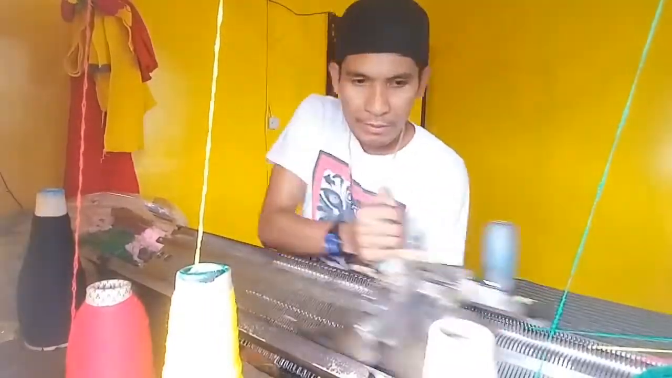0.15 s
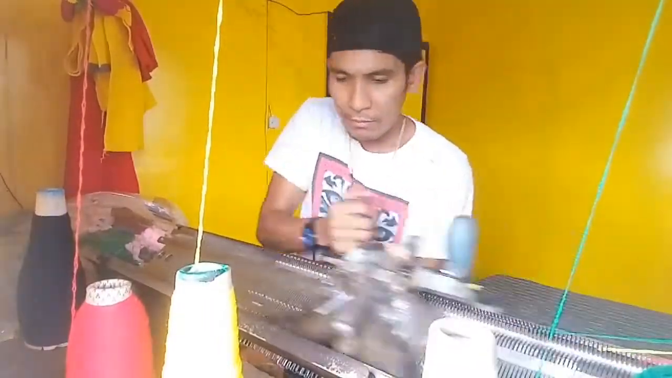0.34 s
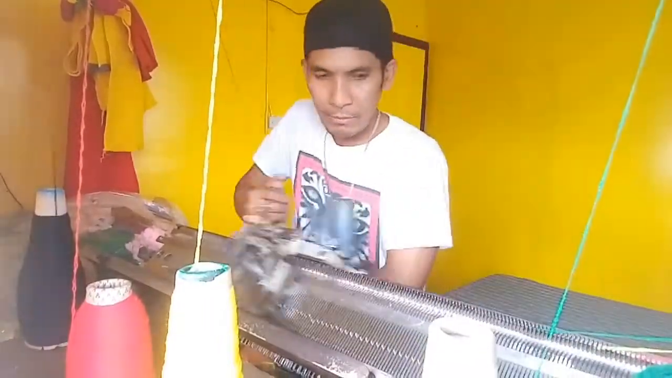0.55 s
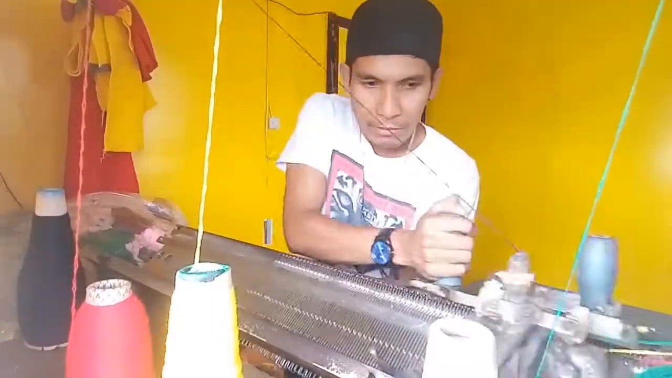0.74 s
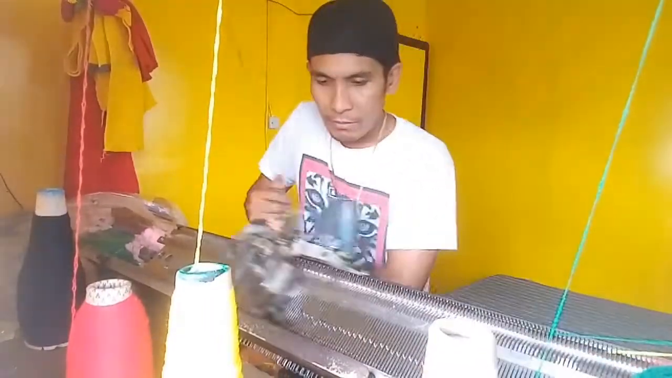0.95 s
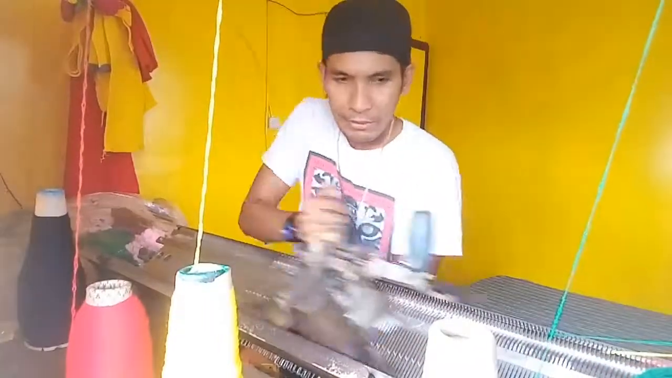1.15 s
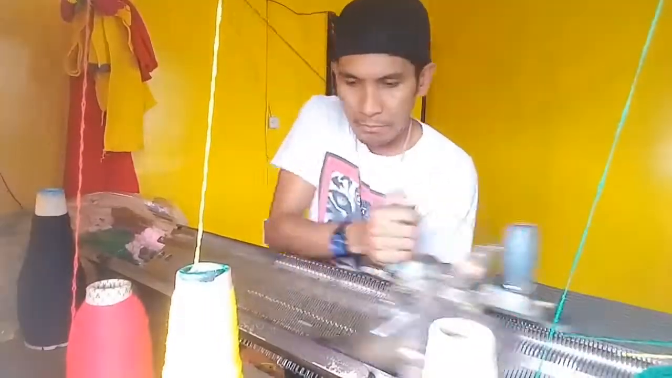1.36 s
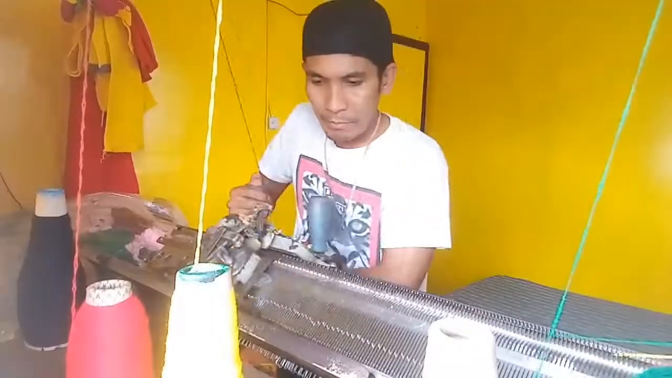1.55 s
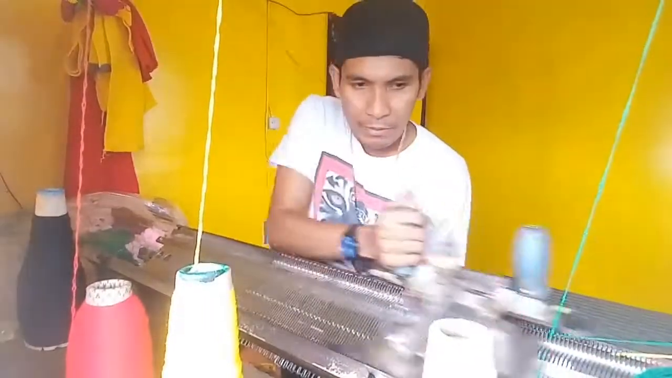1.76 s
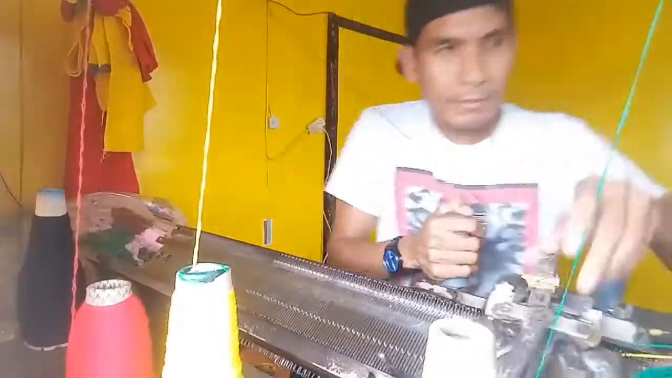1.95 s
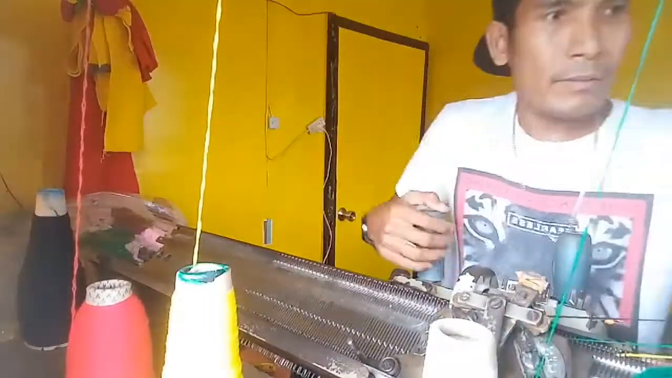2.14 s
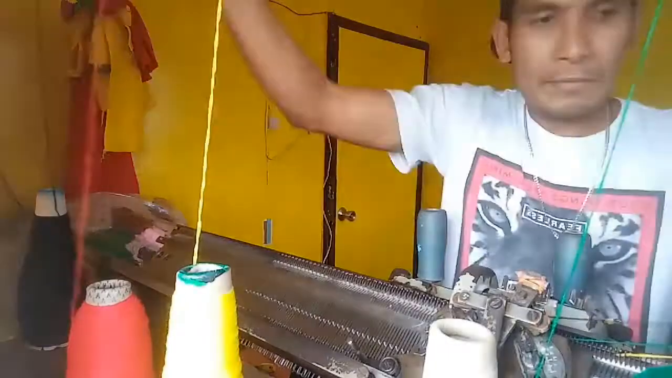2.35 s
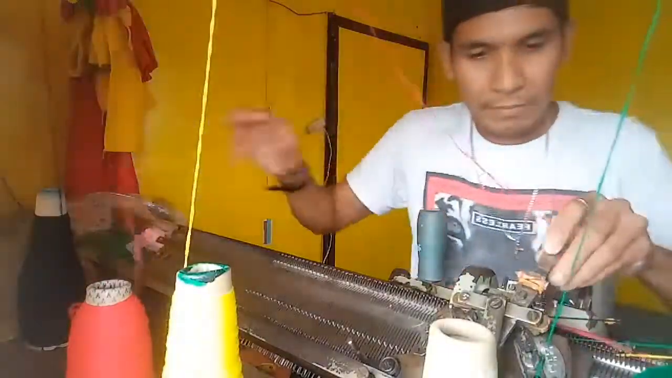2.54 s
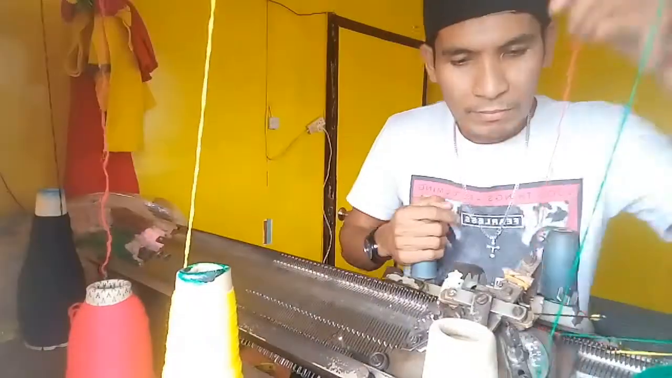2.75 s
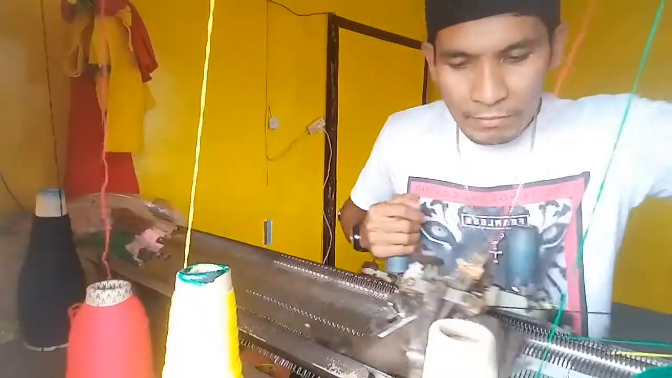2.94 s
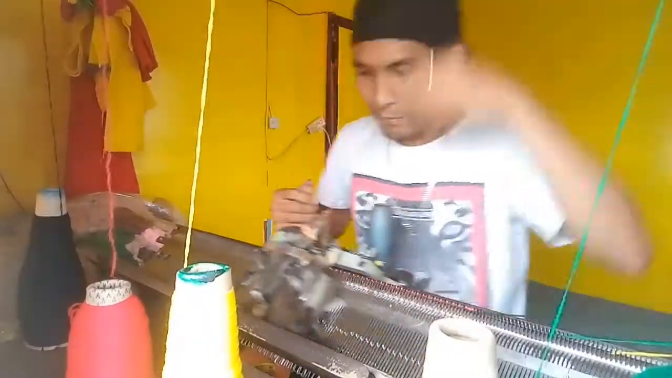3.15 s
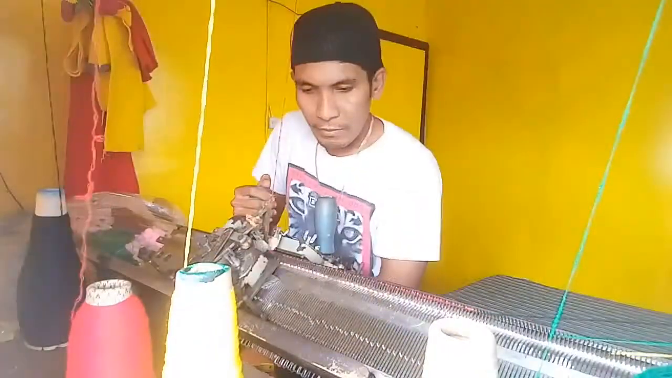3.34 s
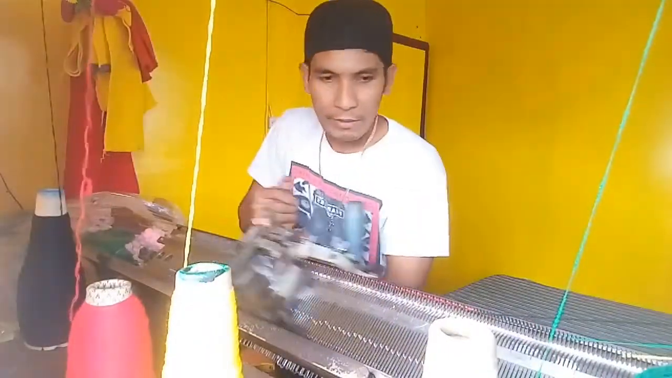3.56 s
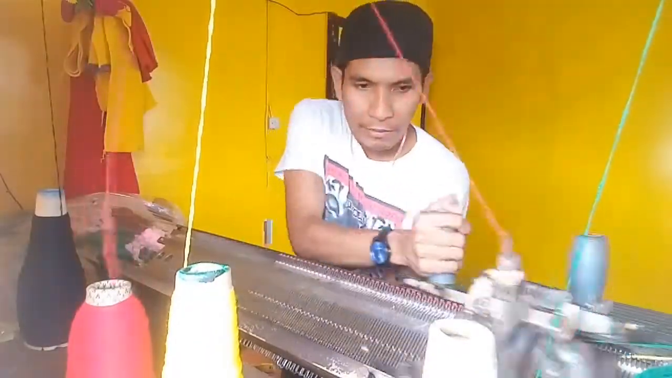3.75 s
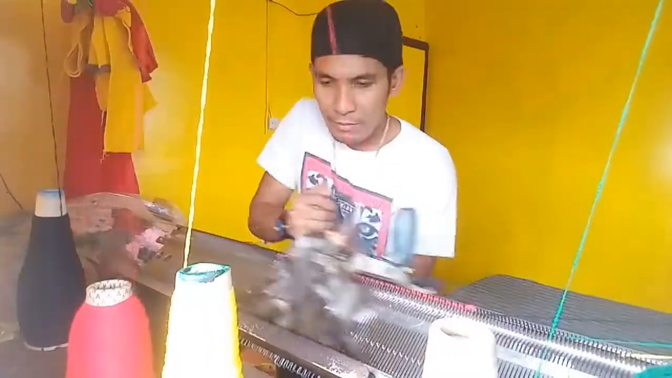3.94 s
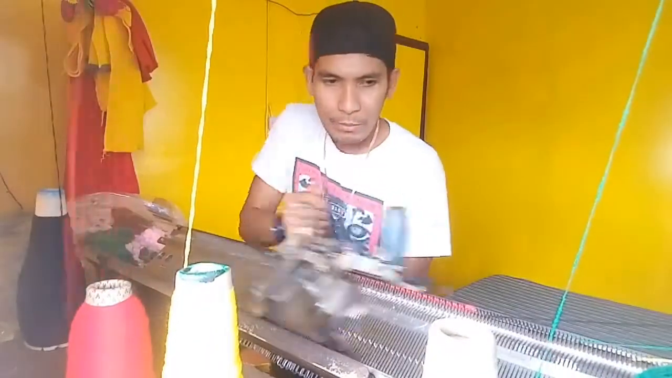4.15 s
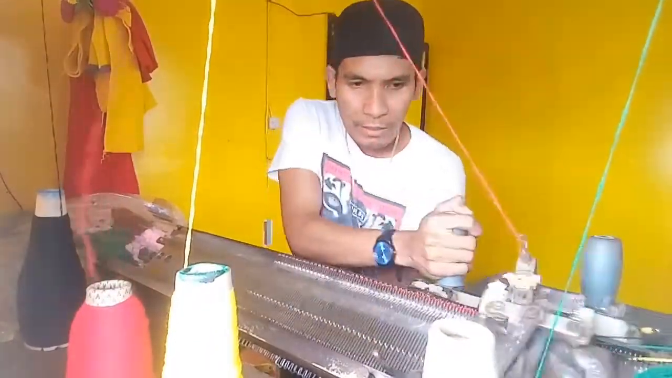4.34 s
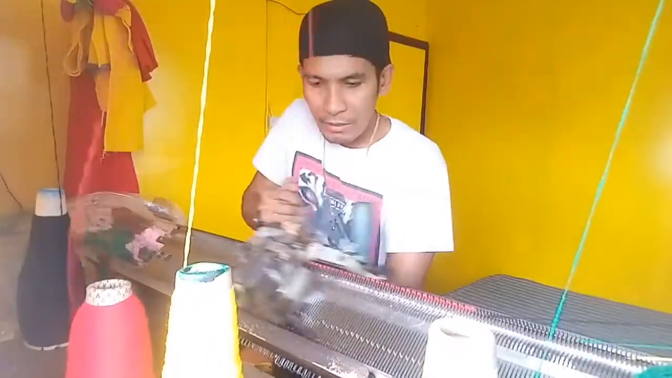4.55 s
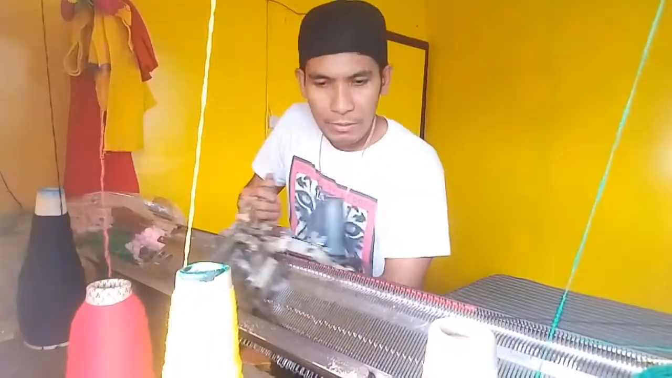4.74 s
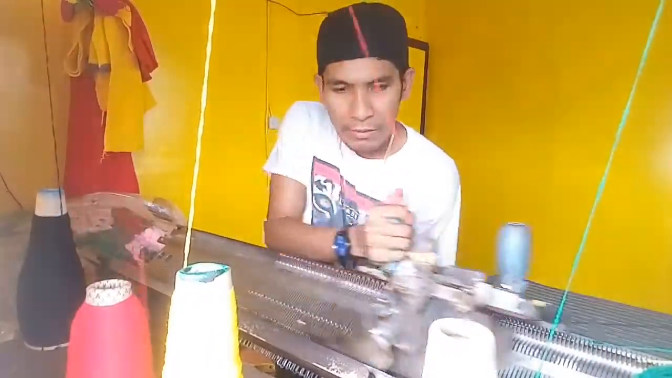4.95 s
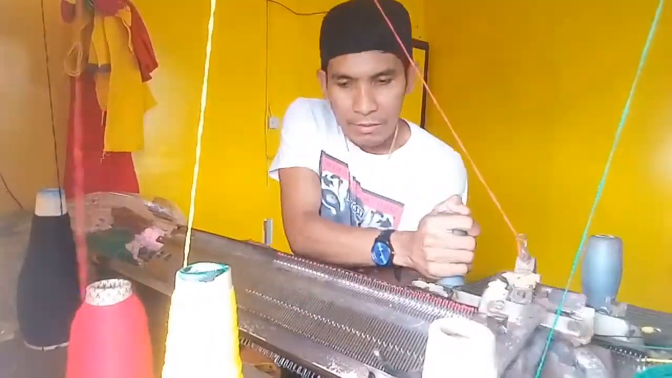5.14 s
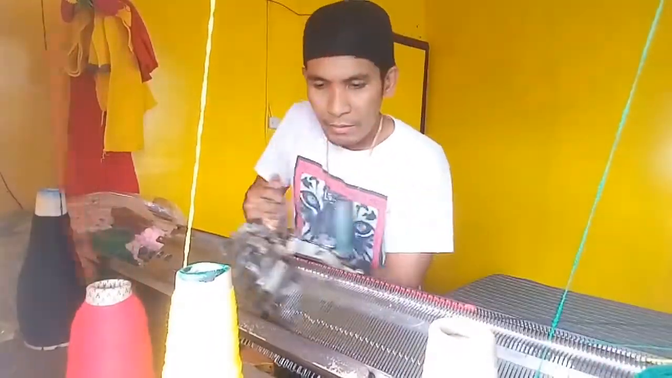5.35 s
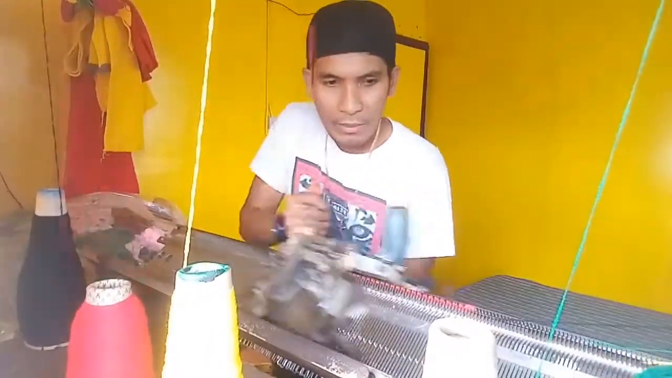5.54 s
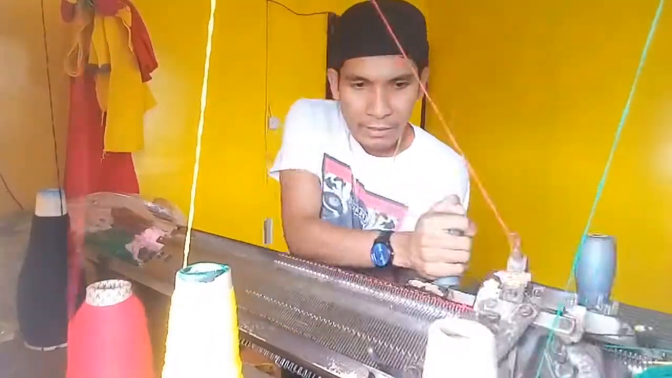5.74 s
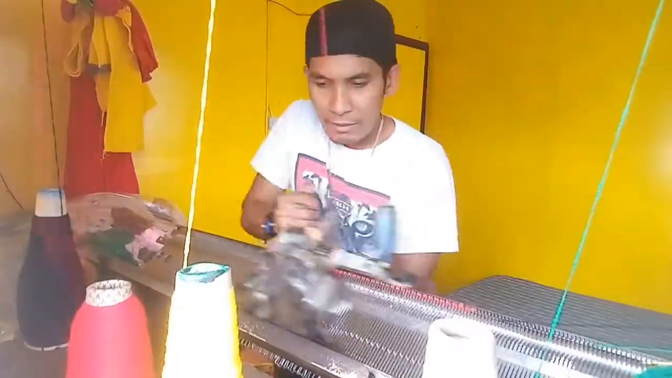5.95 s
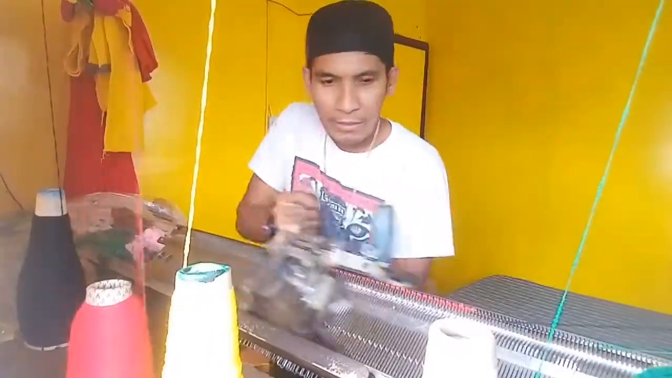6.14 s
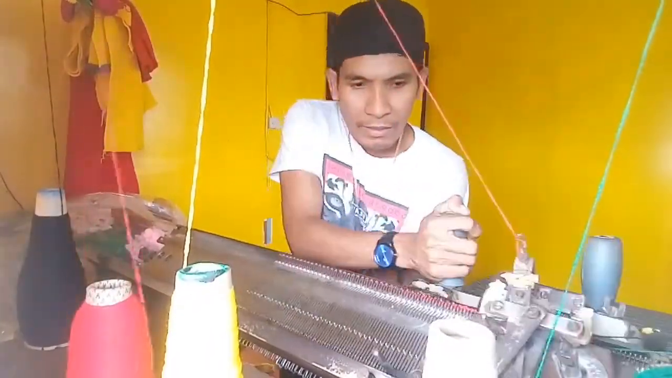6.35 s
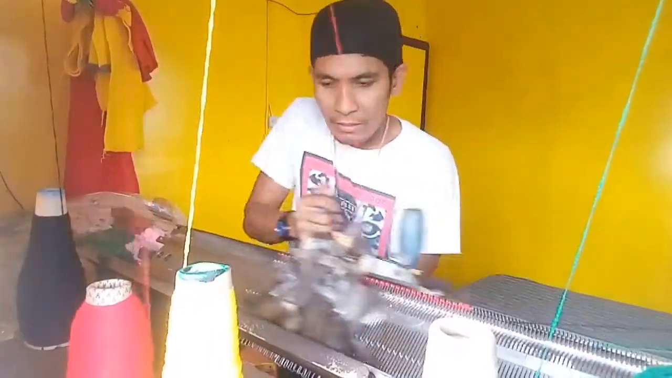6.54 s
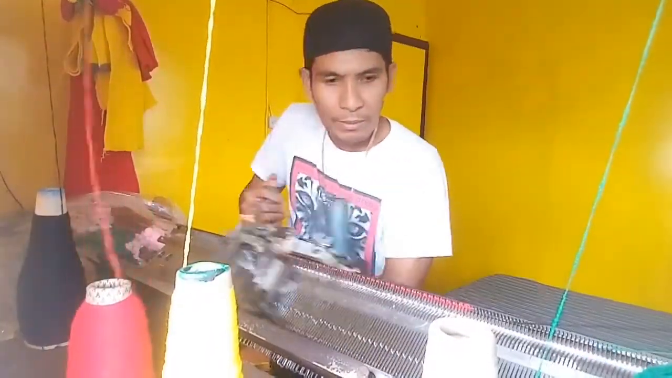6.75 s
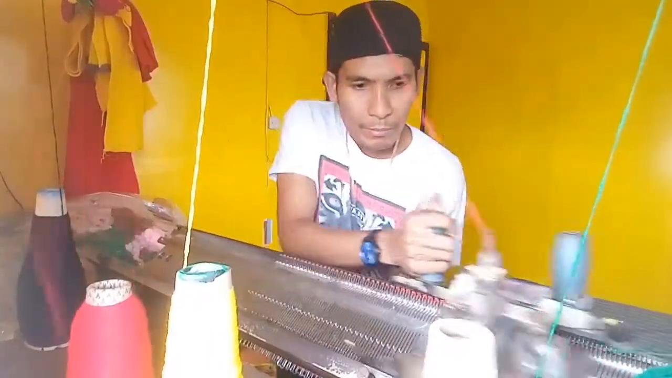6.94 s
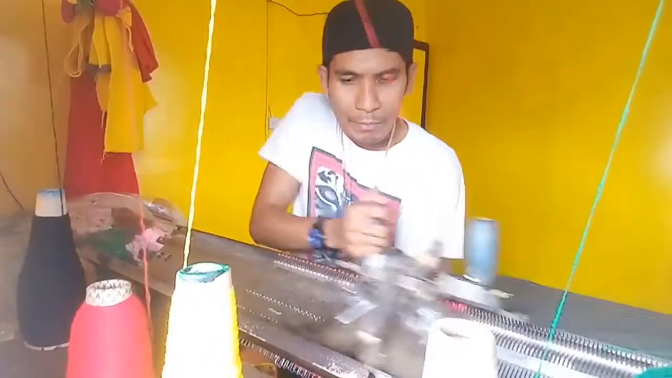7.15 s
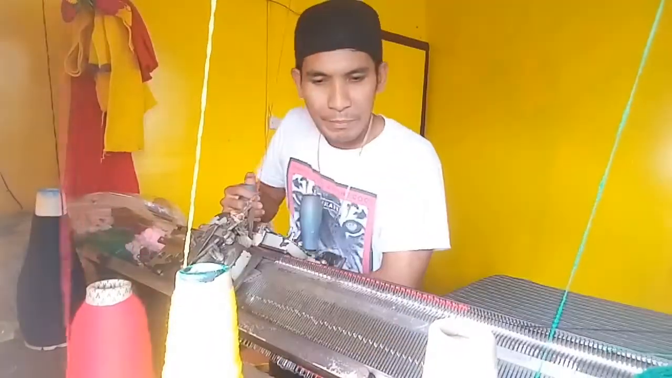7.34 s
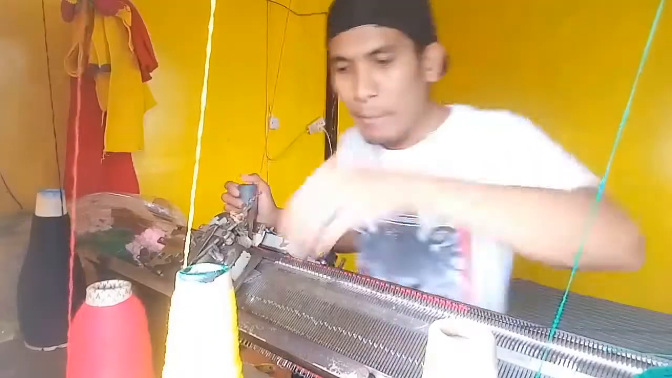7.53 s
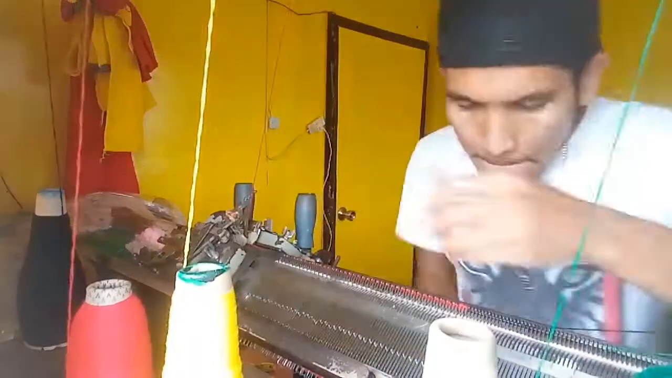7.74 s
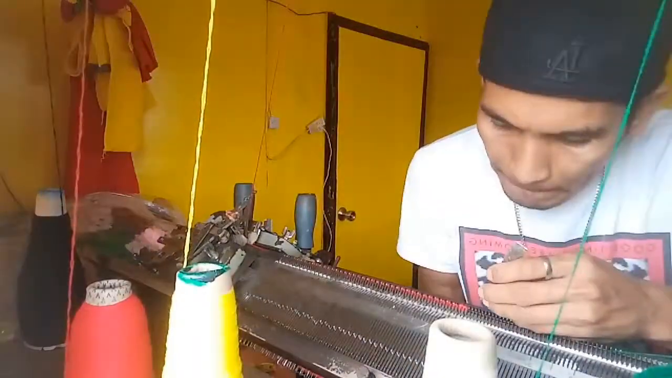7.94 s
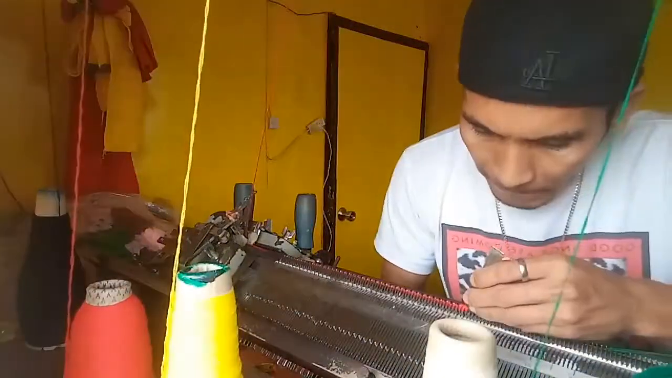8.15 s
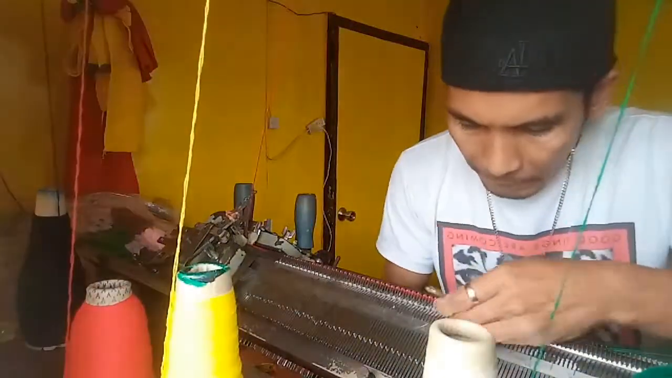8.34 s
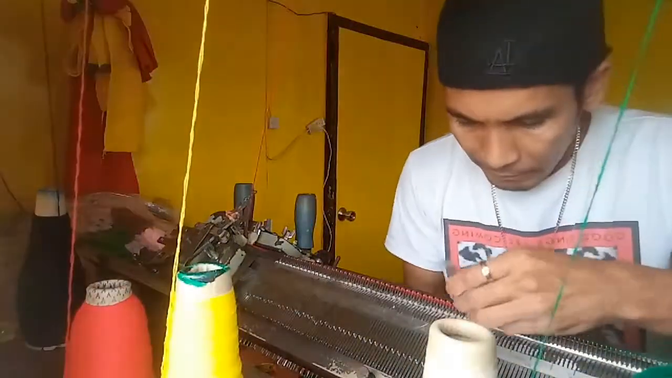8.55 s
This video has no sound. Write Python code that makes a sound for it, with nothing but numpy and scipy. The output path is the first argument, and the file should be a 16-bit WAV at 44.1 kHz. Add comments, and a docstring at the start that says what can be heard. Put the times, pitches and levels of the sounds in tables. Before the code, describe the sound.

Close on the shaking frame of a hand knitting machine in a small room, a steel carriage rakes through needles in bright, zipping strokes, rumbling on its rail and clacking at each turn. After two seconds it rests amid groans, clicks and a squeak, makes one slow pass, then a lever drops. Quick strokes resume until nearly eight seconds, ending in faint bumps and quiet.

```python
"""A bright rattle opens the scene: the cams of a hand knitting machine rake through its needles, in a small room.
The steel carriage is pushed to and fro, about three strokes a second; it rumbles on its rail and clacks at the turns.
Rattle is trains of needle ticks, rumble is noise and ticks through resonances, clacks are dying noise and ringing modes.
It rests three times, with a slow pass after the first, as loose parts are set by hand: the frame groans, sways and
booms, a guide squeaks, parts bump, a lever drops. The microphone stands close, on the shaking frame."""
import sys
import numpy as np
from scipy import signal
from scipy.fft import rfft, irfft, next_fast_len
from scipy.io import wavfile
from scipy.ndimage import uniform_filter1d, map_coordinates

SR = 44100
rng = np.random.default_rng(int(sys.argv[2]) if len(sys.argv) > 2 else 0)


def transcribe(u):
    """Save the signal u as a 16-bit wav file named by the first command-line argument.

    u: samples, shape (n,) or (channels, n), limited to [-1, 1]; the rate is SR.
    q: integer samples, one column per channel.
    """
    v = np.clip(np.atleast_2d(u).T, -1, 1)
    q = np.round(v * 32767).astype(np.int16)
    wavfile.write(sys.argv[1], SR, q)


N = 383229  # length in samples
STILL_DB = -90  # level of a rolling part at a standstill, before trim

# pushes of the carriage, levels before trim: enter_s (cams meet the needles), run_up_s (before enter_s),
# pass_s, coast_s (after the pass), level_db, gathered_db (gained on the way), braked_db (lost in braking),
# weight_db (extra load on the rail)
PUSHES = [ (-.02, 0.056, 0.17, 0.07, -22.5, -3, 2.5, 0.5),
          (0.244, 0.0067, 0.17, 0.029, -21.5, -2, 1.5, -0.5),
          (0.504, 0.026, 0.15, 0.044, -22, -4, 5.5, 0.5), (0.767, 0.031, 0.18, 0.087, -21.5, 1, 14, 1),
          (1.042, .02, 0.14, 0.06, -20.5, -1.5, 6.5, 0), (1.282, 0.014, 0.19, 0.095, -21, 1.5, 14.5, 0),
          (1.535, 0.012, .167, 0.043, -20, 3.5, 7.5, -1.5), (1.831, 0.036, 0.18, 0.018, -21, 0.5, 9.5, 0.5),
          (2.06, 0.0093, 0.21, .016, -21.5, 3, 10.5, 1.5), (3.206, .005, 0.077, .003, -44.5, 0, 2, -5),
          (3.334, .005, 0.081, .01, -43, 3.5, 4, -0.5), (3.424, 0.0017, 0.32, 0.0038, -25, 10.5, 13.5, 0.5),
          (4.042, .015, 0.18, 0.058, -23, -2, 5.5, 1.5), (4.35, 0.015, 0.17, 0.025, -23, -3, 1, 0.5),
          (4.614, 0.025, 0.17, 0.039, -20.5, 0.5, 12, 0),
          (4.879, 0.0058, 0.22, 0.078, -21.5, 5.5, 2.5, -0.5), (5.261, 0.024, .238, .11, -26, -4.5, 4, 3),
          (5.705, 0.029, 0.19, 0.076, -21.5, 0, 8, -1), (6.0, 0.017, 0.2, 0.029, -21, 0, 11.5, 0.5),
          (6.34, 0.0017, .178, 0.076, -22, 0, 1.5, -0.5), (6.614, 0.014, 0.21, .031, -21, 0.5, 9.5, 1.5),
          (6.997, 0.0223, 0.18, 0.043, -23, -4, 9, 0.5), (7.267, 0.0021, 0.21, 0.039, -21.5, -1, 9.5, 1.5),
          (7.656, .003, 0.22, .003, -22, -3.5, 21.5, 1.5)]
# colour of needle contacts: freq_hz, level_db
NEEDLE_COLOUR = [(350, -25.5), (700, -7), (880, -5), (1060, -12), (1270, -3.5), (1750, -5), (2150, -7),
                 (3000, -5.5), (4000, -7), (5450, 1), (7170, 0.5), (8640, -8.5), (10800, -10),
                 (12400, -35.5)]
# colour of the carriage on its rail, and of dull bumps on the bed: freq_hz, level_db
RAIL_COLOUR = [(180, -40.5), (290, -3.5), (400, -1.5), (500, -1.5), (640, 0), (720, -6), (790, -6.5),
               (900, -5), (1060, -18), (1300, -9), (2200, -31.5), (5000, -59)]


def amp(db):
    """Decibels to gain."""
    return 10 ** (np.asarray(db) / 20)


def unit(x):
    """Scale to rms 1."""
    return x / np.sqrt(np.mean(x ** 2) + 1e-20)


def along(points, hz):
    """Read (Hz, value) points on a log frequency axis."""
    f, v = np.transpose(points)
    return np.interp(np.log(hz + 1), np.log(f + 1), v)


def coloured(x, spectrum):
    """Give x the (Hz, dB) colour with a minimum-phase filter, so that attacks stay sharp."""
    m = 2 * next_fast_len(len(x) // 2 + 2048)
    shape_db = along(spectrum, np.fft.rfftfreq(m, 1 / SR))
    # folding the cepstrum makes the filter causal
    cepstrum = irfft(np.log(amp(shape_db) + 1e-6), m)
    cepstrum[1:m // 2] *= 2
    cepstrum[m // 2 + 1:] = 0
    return irfft(rfft(x, m) * np.exp(rfft(cepstrum)), m)[:len(x)]


def add(track, s, sound):
    """Mix a sound in at time s."""
    i = max(round(s * SR), 0)
    track[i:i + len(sound)] += sound[:max(len(track) - i, 0)]


def burst(t60, size=8192):
    """The dense, dying ring of a small steel part: decaying noise, t60 in s."""
    return rng.standard_normal(size) * amp(-60 * np.arange(size) / SR / t60)


def wobble(rate, size):
    """A smooth random curve, rate knots a second."""
    knots = rng.standard_normal(int(size * rate / SR) + 4)
    return map_coordinates(knots, [np.arange(size) * rate / SR])


def shifting(x, depth_db, size=4, count=16):
    """The resonances change as the carriage moves: gains drift, smoothed over size bins and count frames."""
    z = signal.stft(x, nperseg=512)[2]
    field = uniform_filter1d(rng.standard_normal(z.shape), size, 0)
    field = uniform_filter1d(field, count, 1)
    moved = signal.istft(z * amp(depth_db * unit(field)), nperseg=512)[1]
    return unit(moved[:len(x)])


def ticks(rate, scatter, uneven_db):
    """One tick per needle at the given rate, each a little early or late (scatter in needles), strong or weak."""
    count = np.cumsum(rate) / SR
    needle = np.arange(int(count[-1]))
    chance = rng.standard_normal((len(needle), 2))
    at = np.searchsorted(count, needle + scatter * chance[:, 0])
    strength = amp(uneven_db * np.clip(chance[:, 1], -2, 2))
    return np.bincount(at, strength, len(rate) + 1)[:len(rate)]


def contacts(rate, t60, kept_db=-4, count=4):
    """Each needle is raised, flips its latch, is pulled down and is released: four trains of ticks."""
    out = np.zeros(len(rate))
    decay = amp(-60 * np.arange(SR // 10) / SR / t60)
    for _ in range(count):
        train = ticks(rate, scatter=.22, uneven_db=0.5)
        # within a train the cam rings alike each time, but every needle has a ring of its own
        cam = signal.fftconvolve(train, burst(t60))[:len(rate)]
        energy = np.abs(signal.fftconvolve(train ** 2, decay ** 2)[:len(rate)])
        needle_rings = np.sqrt(energy) * rng.standard_normal(len(rate))
        out += amp(kept_db) * cam + needle_rings
    return unit(out)


def needles(peak_rate=420, edge=.003, slow_tilt_db=5.0, judder_db=1.5):
    """The cams run through the needles, fastest in mid-stroke, and leave the last one abruptly."""
    gather_share = 0.52  # part of the pass over which the push reaches its level
    brake_db_per_s = 217.5  # the rattle fades this fast as the arm brakes
    out = np.zeros(N)
    for enter, _, length, _, db, gathered_db, braked_db, _ in PUSHES:
        leave = enter + length
        t = np.arange(max(enter, -edge), leave + edge, 1 / SR)
        way = np.linspace(0, 1, len(t))
        speed = .6 + .4 * np.sin(np.pi * way)
        missing_db = gathered_db * np.clip(1 - way / gather_share, 0, 1)
        braking_db = np.maximum(braked_db - brake_db_per_s * (leave - t), 0)
        level = db - missing_db - braking_db
        clicks = contacts(peak_rate * speed, t60=.012)
        rattle = shifting(coloured(clicks, NEEDLE_COLOUR), depth_db=1.5)
        # gentle contacts are duller than hard ones
        dull = signal.sosfilt(signal.butter(1, 3000, fs=SR, output="sos"), rattle)
        softness = np.clip((np.max(level) - level) / 10, 0, 1)
        rattle = unit(rattle + (amp(slow_tilt_db * softness) - 1) * dull)
        # the carriage judders over stiff and easy stitches
        judder = judder_db * wobble(140, len(t))
        engaged = np.clip(np.minimum(t - t[0], t[-1] - t) / edge, 0, 1)
        add(out, t[0], rattle * engaged * amp(level + judder))
    return out


def pushed(law):
    """Level in dB of a part that builds up with each push, holds through the needles, coasts and dies at the halt."""
    wake_s, dying_s = .02, .07  # fades from and to stillness
    brake_share = 0.11  # part of the braking loss that the rolling parts feel
    over_db, short_db, build, coast_db = law
    t, out = np.arange(N) / SR, np.full(N, float(STILL_DB))
    for enter, run_up, length, coast, db, gathered_db, braked_db, weight_db in PUSHES:
        start, leave = enter - run_up, enter + length
        halt = leave + coast
        built = min(start + build, leave)
        top = db + weight_db + over_db
        braked = top - brake_share * braked_db
        times = [start - wake_s, start, built, (built + leave) / 2, leave, halt, halt + dying_s]
        times = np.maximum.accumulate(times)
        levels = [STILL_DB, top - gathered_db - short_db, top - gathered_db / 2, top,
                  braked, braked - coast_db, STILL_DB]
        now = slice(*np.searchsorted(t, times[[0, -1]]))
        # where pushes overlap, the stronger one is heard
        out[now] = np.maximum(out[now], np.interp(t[now], times, levels))
    return out


def curves(rows):
    """One value per sample for each column after the time."""
    s, *cols = np.transpose(rows)
    return [np.interp(np.arange(N) / SR, s, c) for c in cols]


def resting():
    """Levels in dB of rumble, rail and hiss while hands rest on the machine, ease it along or lean on it."""
    # three spells, levels before trim: time_s, rumble_db, rail_db, hiss_db
    creep = [(2.29, -48, -50, -56), (2.39, -38, -53, -56.5), (2.48, -47, -52, -49), (2.564, -36, -44, -48),
             (2.648, -56, -42.5, -44), (2.71, -43, -45.5, -63), (2.832, -42, -46, -50),
             (3.006, -47, -49.5, -64), (3.026, -44, -50, -53), (3.132, -57, -51.5, -43),
             (3.19, -51.5, -53.5, -50), (3.45, -43.5, -54, -72)]  # hands rest on the machine or ease it along
    pause = [(3.745, -43, -53.5, -49), (3.795, -50.5, -58.5, -71), (3.947, -55, -60.5, -62),
             (3.965, -73, -66.5, -70), (3.991, -45.5, -54, -59), (4.04, -52, -53, -49)]  # the same, more briefly
    lean = [(7.89, -61.5, -72, -65), (8.028, -59, -66, -55), (8.156, -58, -68, -74),
            (8.394, -62, -69, -66.5), (8.69, -63, -61, -73)]  # the machine is leant on in the last rest
    # trim of the spells: rumble_db, rail_db, hiss_db
    rest_trim = (2.5, 2.5, -2)
    t = np.arange(N) / SR
    spells = []
    for rows in (creep, pause, lean):
        inside = (t > rows[0][0]) & (t < rows[-1][0])
        spells.append(np.where(inside, curves(rows), STILL_DB))
    return np.max(spells, axis=0) + np.array(rest_trim)[:, None]


def resonate(x, modes):
    """Ring x through (Hz, width, dB) resonances, each a band-pass applied twice."""
    m = next_fast_len(N + SR // 2)
    f = np.fft.rfftfreq(m, 1 / SR)
    gain = sum(amp(db) * (1j * f * w / (c * c - f * f + 1j * f * w)) ** 2 for c, w, db in modes)
    return irfft(rfft(x, m) * gain, m)[:N]


def shaken(modes, wander_db):
    """Noise shakes a set of resonances; each swells and fades as the load moves across it."""
    out = np.zeros(N)
    for mode in modes:
        out += amp(wander_db * wobble(9, N)) * resonate(rng.standard_normal(N), [mode])
    return unit(out)


def rolling(rumble_db=-1.0, thud_db=-8, hum_db=-3, drone_db=-2, hiss_db=-2, wander_db=3.0,
            brisk_db=-40, bumpy_db=1):
    """Bumps along the rail shake the stand and the bed; the sliding faces hiss."""
    # how each part answers a push: over_db (relative to the stroke, before trim), short_db (missing at the start),
    # build_s (zero or less: at once), coast_db (lost while coasting)
    frame_law = (-12.5, 7.5, 0.1, 2.5)
    bed_law = (-13, 6, 0.34, 4)
    rail_law = (-11, 5, -0.9, 10.5)
    slide_law = (-17, -9.5, -2.5, 8.5)
    # resonances of the iron stand: freq_hz, width_hz, gain_db
    stand_modes = [(80.76, 40, 0), (117.6, 47, -3), (163, 33, -1.5), (206.3, 47, 1.5), (281, 68, -5.5)]
    # resonances of the needle bed under the rolling carriage: freq_hz, width_hz, gain_db
    hum_modes = [(360, 34, -3), (502.7, 76, -2), (573, 90, -5.5), (1511.6, 130, -14), (1815.3, 98, -9)]
    # colour of the shaking frame: freq_hz, level_db
    frame_colour = [(20, -20.5), (42, -4.5), (58, -25.5), (76, -3), (110, -5), (140, -1.5), (200, 0.5),
                    (255, -4), (330, -12), (450, -22), (900, -49)]
    driven = [pushed(frame_law), pushed(rail_law), pushed(slide_law)]
    frame_db, rail_db, slide_db = np.maximum(driven, resting()) + bumpy_db * wobble(25, N)
    bed_db = pushed(bed_law)
    # a creeping carriage mostly rocks the two lowest modes; a brisk one also wakes the upper ones
    upper = amp(np.clip(0.79 * (rail_db - brisk_db), -11, 1.5))
    low_modes, upper_modes = shaken(stand_modes[:2], wander_db), shaken(stand_modes[2:], wander_db)
    stand = (low_modes + upper * upper_modes) / np.sqrt(1 + upper ** 2)
    thud = unit(coloured(rng.standard_normal(N), frame_colour))
    rumble = unit(stand + amp(thud_db) * thud)
    hum = shaken(hum_modes, wander_db)
    drone = shifting(coloured(contacts(np.full(N, 130.), t60=0.038), RAIL_COLOUR), depth_db=3)
    hiss = shifting(coloured(contacts(np.full(N, 110.), t60=0.028), NEEDLE_COLOUR), depth_db=6.5)
    out = amp(frame_db + rumble_db) * rumble
    out += amp(bed_db + hum_db) * hum
    out += amp(rail_db + drone_db) * drone
    out += amp(slide_db + hiss_db) * hiss
    return out


def blow(spectrum, t60, chatter_db, chatter_t60, lead=.01, lead_db=-13, settle=0.025, snap_db=2, size=441):
    """Parts scrape together, snap shut and chatter until they seat; rms 1 over the strike's first size samples."""
    t = np.arange(SR // 8) / SR
    strike = amp(snap_db) * burst(0.013, size=len(t)) + burst(t60, size=len(t))
    unseated = 1 / (1 + (t / settle) ** 10)
    uneven_db = 4.3 * np.minimum(wobble(160, len(t)), 1)
    chatter = unseated * amp(chatter_db + uneven_db) * burst(chatter_t60, size=len(t))
    count = round(lead * SR)
    scrape = amp(lead_db) * np.linspace(0, 1, count) * rng.standard_normal(count)
    x = np.concatenate([scrape, strike + chatter])
    x = shifting(coloured(x, spectrum), depth_db=2)
    return lead, x / np.sqrt(np.mean(x[count:count + size] ** 2))


def ring(modes, vary_db, attack):
    """A struck part's decaying sine modes, at new strengths for each blow."""
    t = np.arange(SR // 3) / SR
    x = np.zeros(len(t))
    for hz, db, t60 in modes:
        level = db + vary_db * rng.standard_normal() - 60 * t / t60
        x += amp(level) * np.sin(2 * np.pi * (hz * t + rng.random()))
    return x * (1 - np.exp(-t / attack))


def clacks(steel_db=-4, knock_db=-4, ring_db=-19):
    """Steel hits steel: a bright crack, a knock of the carriage shell, and the bed rings on in step with the knock."""
    # stops, cam switches and yarn carriers striking, levels before trim: strike_s, crack_db, shell_db
    strikes = [(.199, -35.5, -38), (0.4646, -25.5, -27.5), (.4845, -22.5, -37), (.679, -34, -40),
               (0.7016, -21.5, -35), (0.7442, -21, -32), (0.761, -15, -28.5), (.9968, -23.5, -27),
               (1.018, -14.5, -35.5), (1.221, -25, -37.5), (1.243, -22.5, -36), (1.2848, -17.5, -34.5),
               (1.528, -15, -27.5), (1.796, -35.5, -44), (1.8173, -25.5, -36.5), (2.0612, -20, -27),
               (2.4746, -24, -26.5), (2.5904, -18.5, -33.5), (2.631, -31.5, -24.5), (2.8054, -47, -38.5),
               (2.8542, -44.5, -62), (2.9856, -35, -45), (3.129, -25.5, -38), (3.2027, -29, -34.5),
               (3.2654, -30, -37.5), (3.331, -31, -35.5), (3.344, -33.5, -35.5), (3.8972, -36, -33.5),
               (3.9823, -41.5, -36), (4.0484, -22.5, -28.5), (4.2888, -21, -30.5), (4.35, -23, -37),
               (4.59, -34, -43), (4.84, -38, -55), (5.242, -27.5, -33.5), (5.252, -16.5, -27),
               (5.5934, -33, -33), (5.6764, -25.5, -32), (5.691, -14.5, -22), (5.9934, -18, -39),
               (6.2584, -17.5, -31.5), (6.2753, -24, -33), (6.566, -38, -33), (6.6123, -18, -34),
               (6.8727, -21, -39), (6.8925, -20, -29.5), (6.9578, -22, -26), (6.9725, -14.5, -46),
               (7.243, -41.5, -51), (7.2705, -24, -43.5), (7.5355, -18, -28), (7.5539, -24, -31.5),
               (7.6265, -15, -25), (8.11, -36.5, -35.5), (8.135, -40.5, -36.5), (8.166, -58, -42.5),
               (8.43, -72, -60), (8.498, -55.5, -70), (8.552, -72, -59), (8.6, -77, -58)]
    # the bed sings on after the carriage halts, or at a light touch: start_s, level_db
    touches = [(.199, -47), (1.795, -44), (3.378, -41), (3.48, -41), (3.865, -52.5), (4.225, -35),
               (4.289, -37), (4.797, -25.5), (5.535, -33), (5.592, -43), (6.25, -37.5), (6.87, -49),
               (7.528, -36.5), (8.11, -38.5), (8.421, -49.5), (8.546, -54), (8.589, -54)]
    # ringing of the needle bed: pitch_hz, level_db, t60_s
    bed_modes = [(522, 0, .24), (590, -7, .17), (1160, -15, .11), (1255, -14, .1), (1420, -15, .09),
                 (1800, -19, .07), (2700, -22, .07)]
    # colours of the steel crack and of the shell knock: freq_hz, level_db
    steel_colour = [(900, -39), (2000, -10), (4000, -6.5), (5300, 4), (6300, 4.5), (7300, 2.5), (8500, -5),
                    (10800, -4.5), (12400, -31)]
    knock_colour = [(250, -17), (600, -0.5), (850, -7), (1080, -4.5), (1400, 2), (1750, 0.5), (2300, -4),
                    (3500, -2), (7000, -29)]
    chatter_db = -3.5  # loose parts rattling after a blow; 3 dB less in the shell
    out = np.zeros(N)
    for s, crack_db, shell_db in strikes:
        lead, crack = blow(steel_colour, t60=0.05, chatter_db=chatter_db, chatter_t60=0.4)
        add(out, s - lead, amp(crack_db + steel_db) * crack)
        lead, shell = blow(knock_colour, t60=0.085, chatter_db=chatter_db - 3, chatter_t60=0.21)
        add(out, s - lead, amp(shell_db + knock_db) * shell)
        add(out, s, amp(shell_db + ring_db) * ring(bed_modes, vary_db=1, attack=.0022))
    for s, db in touches:
        add(out, s, amp(db) * ring(bed_modes, vary_db=4, attack=.0022))
    return out


def rubbed_tone(rows, waver, uneven_db, fade=0.016):
    """Stick and slip: an unsteady tone on a (s, Hz, dB) path."""
    hz, db = curves(rows)
    t = np.arange(N) / SR
    on = np.clip(np.minimum(t - rows[0][0], rows[-1][0] - t) / fade, 0, 1)
    phase = 2 * np.pi * np.cumsum(hz * (1 + waver * wobble(120, N))) / SR
    return on * amp(db + uneven_db * wobble(50, N)) * np.sin(phase)


def handling(groan_db=1, squeak_db=-5):
    """Under the hands the frame groans, sways and booms, a guide squeaks, parts bump and a lever drops."""
    # paths of rubbed tones, groan and squeak before trim: time_s, pitch_hz, level_db
    groan = [(2.32, 170.2, -42), (2.39, 170.7, -39), (2.48, 200, -36), (2.54, 175.4, -43),
             (2.73, 160.3, -43), (2.86, 151.6, -48), (2.91, 229.6, -40), (2.97, 240, -43),
             (3.04, 158.9, -53.5)]  # the frame is leant on
    sway = [(3.16, 88.4, -44), (3.37, 82.6, -45), (3.73, 80.2, -38), (3.8, 80, -58)]  # the frame's low sway during the slow pass
    squeak = [(2.85, 1940, -51), (2.95, 2020, -63), (3.0, 2150, -35), (3.06, 1957, -73)]  # a dry guide, as the carriage is eased along
    boom = [(8.008, 150, -44), (8.04, 143, -35), (8.072, 140, -45)]  # the stand booms softly, pressed once
    # dull bumps of hands and parts on the bed: strike_s, level_db
    thuds = [(2.45, -40.5), (2.631, -39), (3.872, -54), (7.662, -26.5), (8.11, -35.5), (8.425, -56),
             (8.548, -53.5)]
    # a lever drops home and rings: strike_s, level_db
    lever_drops = [(3.896, -24.5), (3.981, -43.5)]
    # ringing of the lever: pitch_hz, level_db, t60_s
    lever_modes = [(700, -5.5, 0.047), (1450, -4.5, 0.023), (1607, -2, .05), (1870, -13.5, .05),
                   (2260, -14.5, .08), (2374, -1, 0.044)]
    out = amp(groan_db) * rubbed_tone(groan, waver=0.087, uneven_db=5.5)
    out += rubbed_tone(sway, waver=0.051, uneven_db=-1.0)
    out += amp(squeak_db) * rubbed_tone(squeak, waver=.02, uneven_db=1.5)
    out += rubbed_tone(boom, waver=.12, uneven_db=1.5)
    for s, db in thuds:
        lead, thud = blow(RAIL_COLOUR, t60=.15, chatter_db=0, chatter_t60=0.36, settle=0.045, snap_db=-11)
        add(out, s - lead, amp(db) * thud)
    for s, db in lever_drops:
        add(out, s, amp(db) * ring(lever_modes, vary_db=2.0, attack=.0004))
    return out


def room(x):
    """The walls' answer: a noise tail whose decay time depends on frequency, soonest gone at both extremes."""
    # decay of the small room: freq_hz, t60_s
    room_decay = [(150, 0.11), (1500, 0.55), (10000, 0.15)]
    hz, t, z = signal.stft(rng.standard_normal(SR // 2), SR, nperseg=256)
    decay = amp(-60 * t / along(room_decay, hz)[:, None])
    tail = signal.istft(z * decay, SR, nperseg=256)[1]
    return signal.fftconvolve(x, tail / np.linalg.norm(tail))[:N]


def scene(room_db=-24, hush_db=-66):
    """The machine close by, a little room, and the room's quiet."""
    # colour of the room's quiet: freq_hz, level_db
    hush_colour = [(18, -39.5), (30, -7), (86, 5.5), (387, -21), (689, -20.5), (1080, -2), (7840, -38),
                   (12000, -65.5), (15600, -77.5), (22000, -120)]
    machine = needles() + rolling() + clacks() + handling()
    hush = amp(hush_db) * unit(coloured(rng.standard_normal(N), hush_colour))
    return (machine + amp(room_db) * room(machine) + hush)[None]


def record(dry):
    """The recorder rounds off the highest peaks and keeps nothing above its band limit."""
    top_hz = 12400
    rounded = dry / (1 + (dry / .55) ** 4) ** (1 / 4)
    m = next_fast_len(N + SR // 2)
    kept = np.fft.rfftfreq(m, 1 / SR) < top_hz
    return irfft(rfft(rounded, m) * kept, m)[:, :N]


dry = scene()
out = record(dry)
transcribe(out)
```